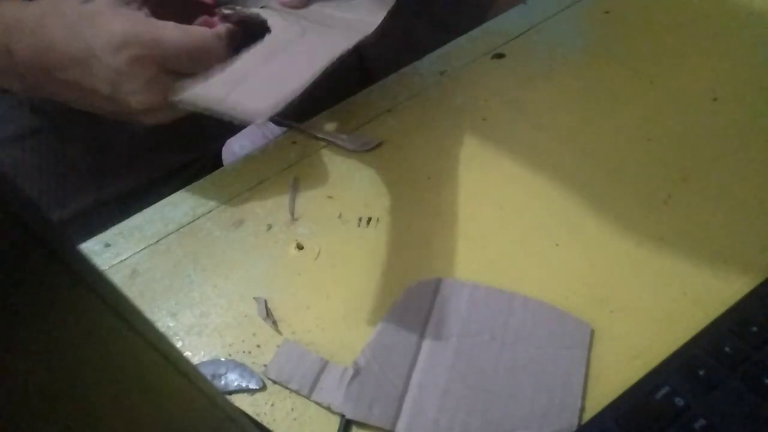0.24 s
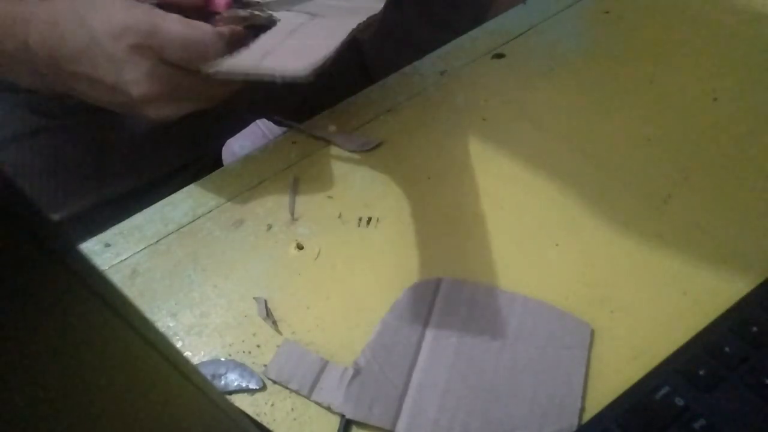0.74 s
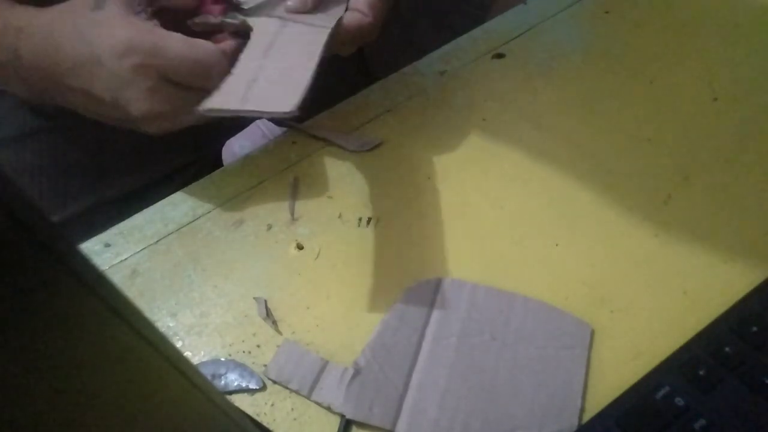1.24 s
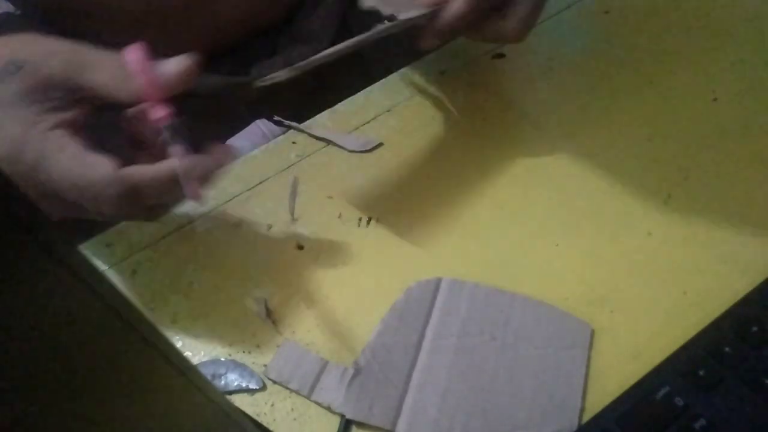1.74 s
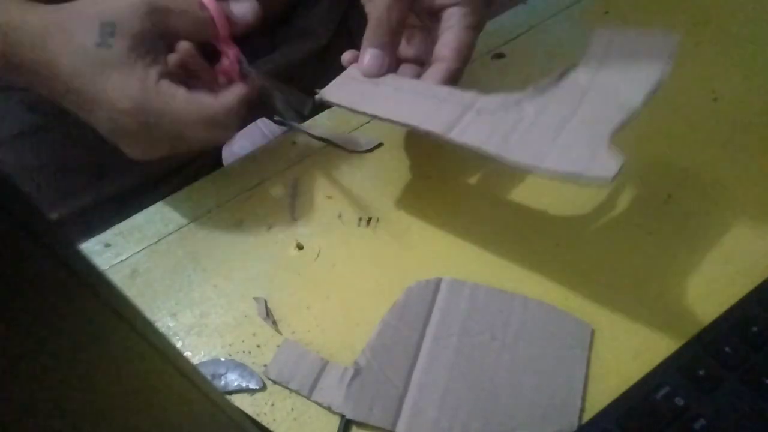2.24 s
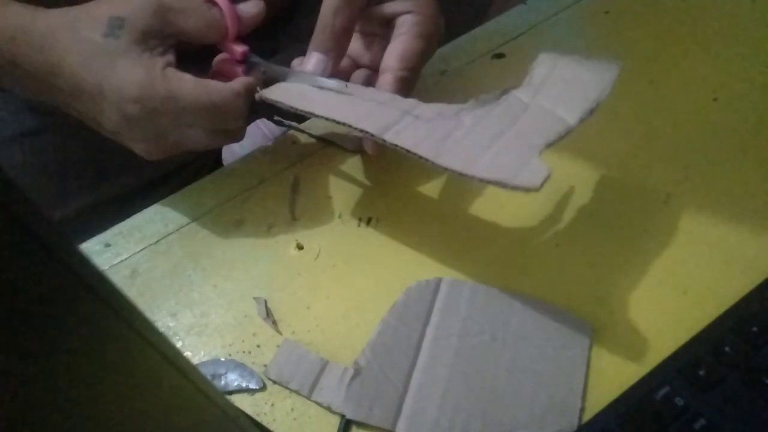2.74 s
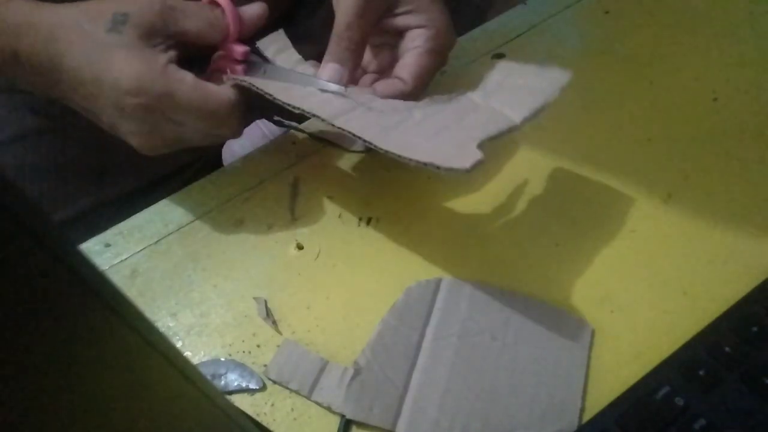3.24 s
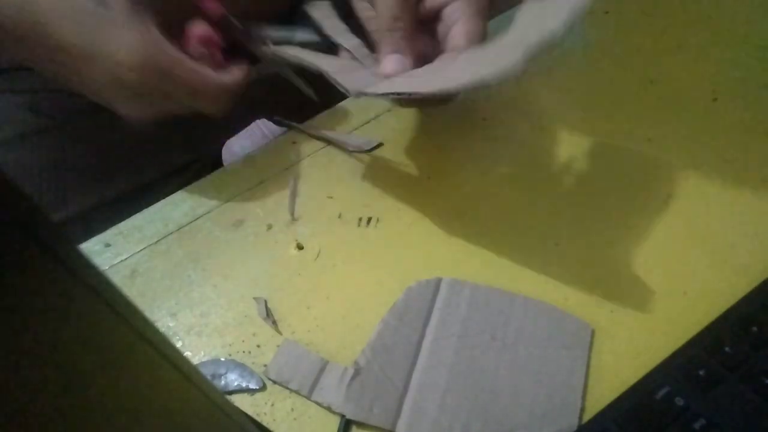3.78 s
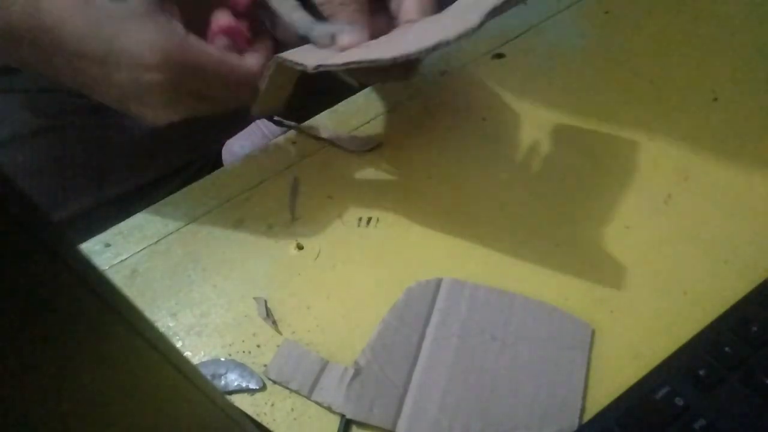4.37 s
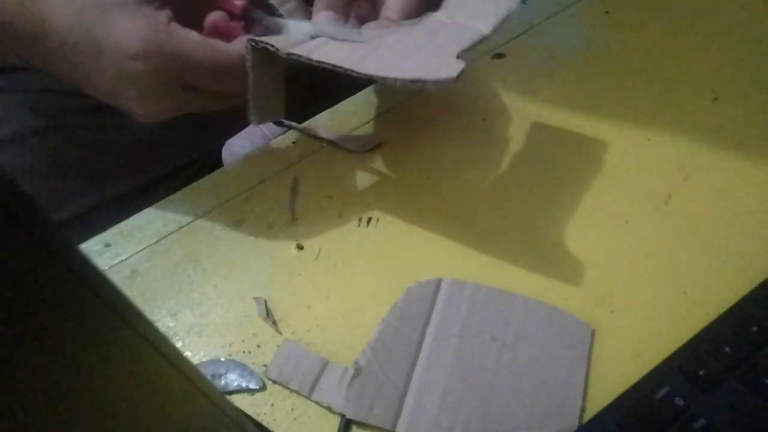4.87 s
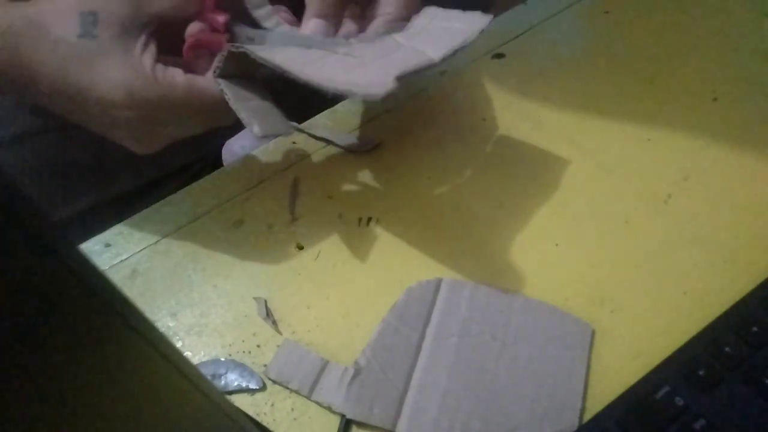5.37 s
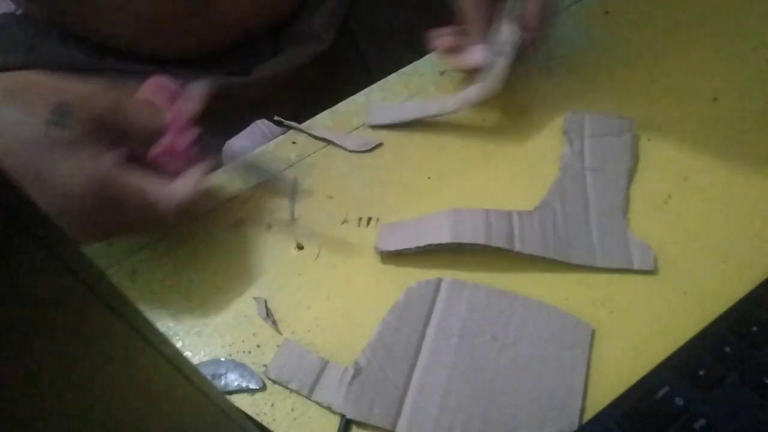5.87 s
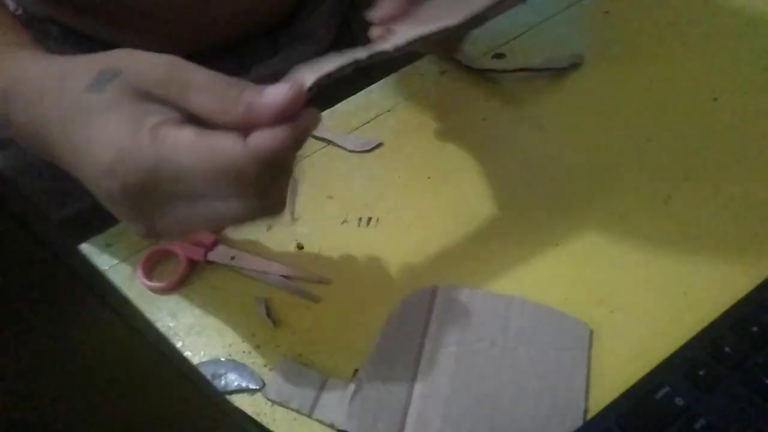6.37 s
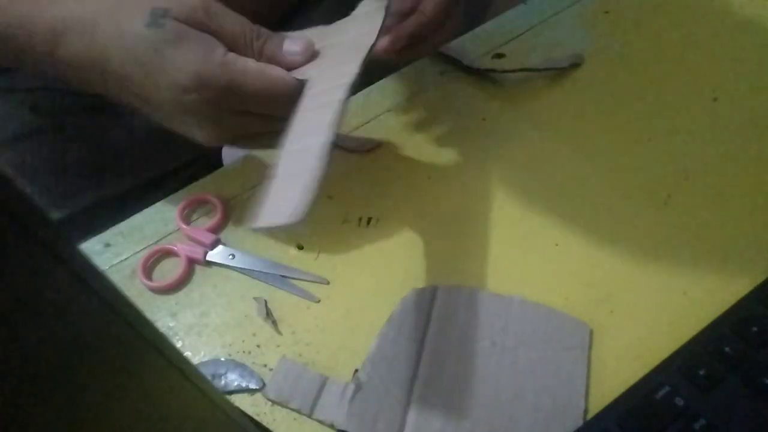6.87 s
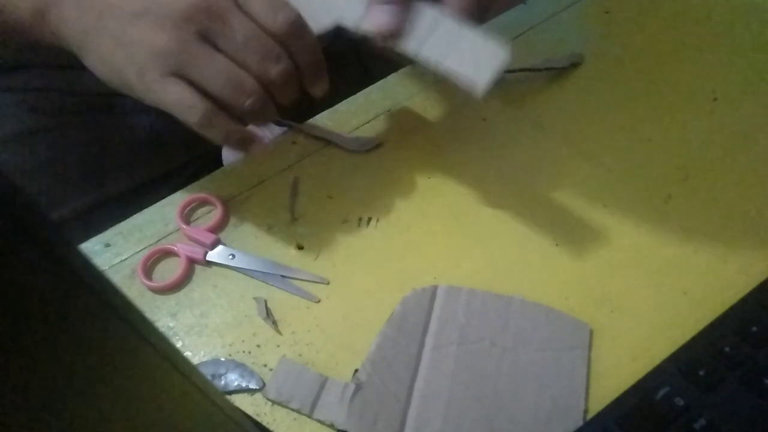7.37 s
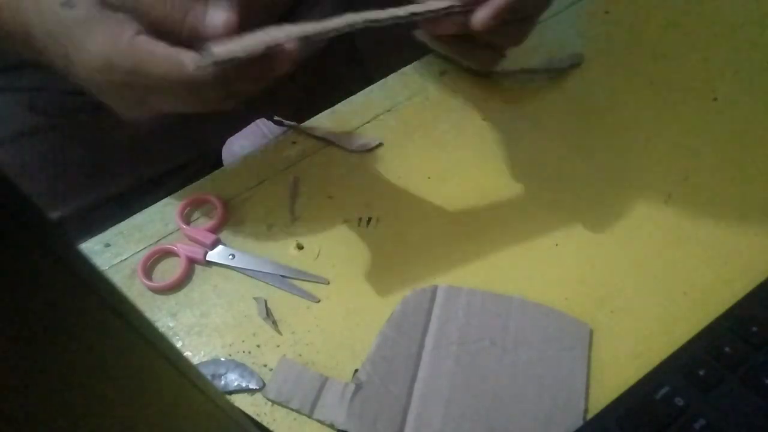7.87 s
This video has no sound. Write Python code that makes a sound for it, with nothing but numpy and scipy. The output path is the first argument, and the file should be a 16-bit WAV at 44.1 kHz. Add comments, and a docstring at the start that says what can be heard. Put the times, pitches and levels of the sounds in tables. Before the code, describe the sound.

A fan's draught buffets a nearby phone microphone with an uneven low rumble and thumps, over a faint rush of air in a room. Close by, scissors and fingers scrape, crunch and click through a piece of cardboard in irregular clusters. Near the end the scissors land on the table with a brief clatter, followed by more light rasping as the card is handled.

```python
"""Low thumps of a fan's draught on the microphone, and cardboard snapping under small scissors.
Blades and fingers rasp over the corrugated card in short strokes; fibres break and the sheet knocks.
The blades squeak faintly once; near 6 s the scissors ring against the table, then the rasping goes on.
The fan's steady rush fills the middle. All is heard in a room, close to a phone."""
import sys
import numpy as np
from scipy import signal
from scipy.fft import rfft, irfft, next_fast_len
from scipy.io import wavfile
from scipy.ndimage import uniform_filter1d

SR = 44100
rng = np.random.default_rng(int(sys.argv[2]) if len(sys.argv) > 2 else 0)


def wav_out(sig):
    """Save sig, one row per channel (or a flat mono array), as 16-bit PCM at SR to the path in sys.argv[1]."""
    wavfile.write(sys.argv[1], SR, np.round(np.clip(np.atleast_2d(sig).T, -1, 1) * 32767).astype(np.int16))


N = 358533
BURST_SAMPLES = int(.12 * SR)

# Blade or finger strokes on the card: t/s, length/s, level/dB, swell/dB, coarse-fibre lift/dB
STROKES = [(0.245, 0.028, -64.5, 7, -1), (0.594, 0.067, -56.5, 6, 1), (0.757, 0.02, -52, -2, 1),
           (0.845, 0.051, -57, -3, -4), (0.912, 0.035, -56.5, -8, -2), (0.945, 0.062, -54, 0, 4),
           (1.186, 0.059, -50, -2, 3.5), (1.351, 0.029, -49, 2, -1), (1.417, 0.041, -51.5, -17, 4),
           (1.483, 0.16, -54, -15.5, -0.5), (1.843, 0.08, -49.5, -2, -5.5), (2.096, 0.11, -61, -13, -7),
           (2.222, 0.043, -51, 5, -13), (2.698, 0.031, -47, 13, -13), (2.8, 0.038, -46.5, -2, -9),
           (2.869, 0.055, -49.5, -19, -13), (2.988, 0.03, -57, -4, -6), (3.075, 0.077, -48.5, -4, -2.5),
           (3.215, 0.054, -51, -2, -0.5), (3.322, 0.036, -46, -11, -1.5), (3.503, 0.052, -51.5, -8, -8),
           (3.572, 0.043, -55, 5, -2), (3.66, 0.033, -54.5, -5, -8), (3.742, 0.038, -48, -8, 5),
           (3.825, 0.07, -63, -2, 0), (3.904, 0.049, -57.5, -17, 6.5), (3.992, 0.072, -54, 7, 0.5),
           (4.099, 0.022, -39.5, -7, 0), (4.281, 0.05, -49.5, 10, -3), (4.346, 0.04, -44, -5, -1),
           (4.39, 0.045, -54, -4, -4), (4.565, 0.042, -61, -5, 3), (4.639, 0.032, -46.5, -5, -6),
           (4.76, 0.05, -37.5, -4, -6), (4.884, 0.073, -58, -12, -2), (4.987, 0.033, -49, -7, -1),
           (5.108, 0.018, -46.5, -3, -3), (5.151, 0.066, -54.5, -15, -10), (5.239, 0.071, -52.5, 20, -0.5),
           (5.386, 0.05, -53.5, -18, -2), (5.502, 0.046, -49, 1, 1), (5.716, 0.022, -51.5, -11, -6),
           (5.77, 0.028, -52, 2, -2), (5.806, 0.027, -52, 9, -4), (6.129, 0.065, -46.5, 3, 1),
           (6.196, 0.053, -50, 1, 3.5), (6.339, 0.024, -44.5, 7, -8), (6.37, 0.089, -49.5, -3, -4),
           (6.455, 0.048, -46.5, 1, -2), (6.522, 0.042, -52, -7, 0), (6.571, 0.089, -50.5, 2, 1),
           (6.697, 0.033, -54.5, -2, -3), (6.778, 0.072, -55, -18, -4), (6.85, 0.033, -56, -10, 2),
           (6.942, 0.025, -60, 23, 3), (7.034, 0.092, -50, 11, -4.5), (7.227, 0.066, -49.5, 4, -2),
           (7.315, 0.053, -66, -4, 2), (7.362, 0.11, -46.5, 3, -5), (7.45, 0.13, -52, 10, -1),
           (7.795, 0.05, -57, 6, -3), (8.008, 0.035, -52, 3, -2)]


def rasp():
    """Dense tearing fibres of uneven size, pressed on and let go in strokes."""
    # Tearing spectrum: f/Hz, density/dB
    spectrum = [(1000, -16.5), (2500, -15.5), (5500, -18.5), (7000, -13.5), (7800, -3.5), (8570, 0),
                (9300, -7.5), (10400, -12), (13500, -14), (15500, -9.5)]
    press_db_per_s, release_db_per_s, arch_db, rustle_db = 1800, 1207, 3.5, -70.5
    t, power = np.arange(N) / SR, np.zeros(N)
    for start_s, length_s, db, swell_db, _ in STROKES:
        age_s = t - start_s
        db += swell_db * (np.clip(age_s / length_s, 0, 1) - .5)
        db -= arch_db * np.minimum((2 * age_s / length_s - 1) ** 2, 1)  # lighter at both ends
        db -= press_db_per_s * np.maximum(0.0043 - age_s, 0)
        db -= release_db_per_s * np.maximum(age_s - length_s + 0.0093, 0)
        power += undb(2 * db)
    ticks = 1 + 28 * uniform_filter1d(1. * (rng.random(N) < 130 / SR), size=14)  # stiffer fibres let go
    fibres = colour(rng.standard_normal(N) * undb(0.93 * walk(700)) * ticks, spectrum)
    grip_tremble = undb(1.6 * walk(60))
    rustle = undb(rustle_db + 5.7 * walk(25))  # card in the hands
    return level(fibres, 0) * (np.sqrt(power) * grip_tremble + rustle)


def snaps():
    """Fibres and flutes break: broad crackle with a faint after-rustle."""
    # Breaks in the card: t/s, level/dB
    breaks = [(0.066, -43), (0.1454, -31.5), (0.1634, -43), (0.176, -39), (0.392, -30.5), (0.5169, -34),
              (0.5428, -23), (0.597, -35), (1.0846, -32), (1.102, -20), (1.3247, -41.5), (1.3373, -41),
              (1.421, -35), (1.595, -34.5), (2.727, -32), (2.875, -26.5), (2.884, -28), (2.901, -29.5),
              (2.927, -28.5), (3.027, -46), (3.052, -42), (3.218, -27.5), (3.242, -39), (3.259, -33),
              (3.316, -39), (3.432, -42), (3.448, -29), (3.4617, -37), (3.477, -36), (3.785, -38),
              (4.101, -30.5), (4.1137, -32), (4.243, -45), (4.357, -31.5), (4.37, -34), (4.6433, -32.5),
              (4.8757, -33), (4.8962, -30.5), (4.913, -35), (5.024, -38.5), (5.063, -47), (5.0917, -37),
              (5.176, -33.5), (5.223, -36.5), (5.297, -42), (5.602, -37), (5.61, -41), (5.625, -29.5),
              (5.631, -35), (5.717, -35.5), (5.765, -34.5), (5.826, -44), (5.889, -42), (6.0644, -25),
              (6.14, -27.5), (6.643, -34), (6.787, -35), (6.98, -47), (7.22, -46)]
    # Crackle spectrum: f/Hz, density/dB
    spectrum = [(400, -29), (900, -8), (2000, -4.5), (5000, -16), (8500, 8.5), (10500, -2), (15500, -6)]
    envelope = np.zeros(N)
    for start_s, db in breaks:
        add(envelope, start_s, undb(db) * (burst(0.0007, 0.013) + 0.16 * burst(0.0023, 0.054)))
    crackle = colour(rng.standard_normal(N), spectrum)
    return level(crackle, 0) * envelope


def stroke_angle(x):
    """Each stroke meets the card at its own angle: more or less coarse fibre, its own flutes singing."""
    flute_hz = (6400, 7300, 9700, 11500)
    starts_s, coarse_db = np.transpose(STROKES)[[0, 4]]
    stroke = np.maximum(np.searchsorted(starts_s, np.arange(N) / SR) - 1, 0)

    def held(per_stroke):
        return uniform_filter1d(per_stroke[stroke], size=100)

    coarse = signal.sosfiltfilt(signal.butter(2, 6800, fs=SR, output="sos"), x)
    fine = signal.sosfiltfilt(signal.butter(2, 10500, "high", fs=SR, output="sos"), x)
    *shares, fine_draw = rng.random((len(starts_s), 5)).T
    flutes = sum(held(share ** 3) * level(ring(x, hz, .003), 0) for share, hz in zip(shares, flute_hz))
    fine_db = held(6 * (fine_draw - .5))
    shelved = x + (undb(held(coarse_db)) - 1) * coarse + (undb(fine_db) - 1) * fine
    return shelved + 0.28 * np.std(x) * flutes


def knocks():
    """A blade's knock rings the sheet at its pitch, with a damped higher mode and a broad crunch."""
    # Knocks on the sheet: t/s, peak/dB, f/Hz
    hits = [(0.543, -30.5, 1290), (1.085, -39.5, 640), (1.105, -33.5, 1246), (1.42, -49, 1600),
            (2.902, -38.5, 740), (2.928, -35.5, 790), (3.449, -33.5, 1180), (3.46, -35.5, 850),
            (3.478, -38.5, 1440), (3.219, -45, 1390), (5.094, -35.5, 1190), (5.627, -34.5, 1240),
            (5.826, -43, 2240)]
    out = np.zeros(N)
    for start_s, db, hz in hits:
        push = np.gradient(burst(0.0017, 0.017) * rng.standard_normal(BURST_SAMPLES))
        sheet = ring(push, hz, 0.054) + 2.2 * ring(push, 1.166 * hz, 0.01)
        sheet += 1.8 * ring(push, 2050, 0.0014)  # crunch
        add(out, start_s, undb(db) * sheet / np.abs(sheet).max())
    return out


def set_down():
    """Scraping contact with the table rings the steel blades and plastic handles."""
    # Table contacts: t/s, peak/dB, contact t60/s, handle share/0-1
    contacts = [(6.047, -35, 0.24, 0.55), (6.064, -21, 0.012, 0.12), (6.138, -23, 0.086, 0.67),
                (6.15, -26, 0.053, 0.9), (6.225, -34.5, 0.08, 0.56)]
    # Blade modes: f/Hz, gain/dB, t60/s
    blade_modes = [(1600, -3, 0.012), (2120, -1.5, 0.014), (3140, -3.5, 0.006), (4370, -2, 0.0049)]
    # Handle modes: f/Hz, gain/dB, t60/s
    handle_modes = [(413, -14, 0.042), (836, 4, 0.016), (1190, 1, 0.0078), (1800, -2, 0.01)]
    out = np.zeros(N)
    for start_s, peak_db, contact_s, share in contacts:
        push = burst(0.00059, contact_s) * rng.standard_normal(BURST_SAMPLES)
        blades = sum(undb(db) * ring(push, hz, t60_s) for hz, db, t60_s in blade_modes)
        handles = sum(undb(db) * ring(push, hz, t60_s) for hz, db, t60_s in handle_modes)
        click = ring(push, 2240, 0.002)
        clack = (1 - share) * level(blades, 0) + share * level(handles, 0) + 0.26 * level(click, 0)
        add(out, start_s, undb(peak_db) * clack / np.abs(clack).max())
    return out


def squeak():
    """Blades slide open: two faint, thin, flickering bands."""
    start_s, end_s, fade_s, band_db = 2.2, 2.5, .03, -69
    t, bands = np.arange(N) / SR, np.zeros(N)
    for hz in (14000, 14900):
        band = ring(ring(rng.standard_normal(N), hz, .004), hz, .004)
        bands += level(band * undb(4 * walk(25)), band_db)
    return bands * np.clip(np.minimum(t - start_s, end_s - t) / fade_s, 0, 1)


def draught():
    """Turbulence on the microphone: uneven pressure kicks, louder and brighter in a gust."""
    # Gust strength: t/s, level/dB
    gusts = [(0.1, -32), (0.44, -40), (0.6, -33), (1.2, -42.5), (1.42, -34), (1.94, -46.5), (2.12, -36.5),
             (2.4, -41), (2.55, -33.5), (2.8, -37), (4.26, -37), (4.5, -32), (5.2, -36.5), (6.1, -32),
             (6.6, -37.5), (6.68, -46.5), (7.48, -38.5), (7.69, -34), (8.13, -37)]
    # Pressure-kick spectrum: f/Hz, density/dB
    spectrum = [(15, -17), (30, 2.5), (70, 1.5), (120, -3.5), (190, -13), (280, -29), (450, -64),
                (1000, -76)]
    kicks_per_s, neutral_db, bright_db_per_db = 220, -29, 0.15
    gust_db = np.interp(np.arange(N) / SR, *np.transpose(gusts))
    onsets = rng.random(N) < kicks_per_s / SR
    lumps = walk(12)  # the flow arrives in lumps, a few a second
    lumps = level(lumps - uniform_filter1d(lumps, size=SR // 2), 0)
    kicks = level(colour(rng.standard_normal(N) * onsets * undb(3.24 * lumps), spectrum), 0)
    swirl = signal.sosfilt(signal.butter(2, [22, 65], "band", fs=SR, output="sos"), rng.standard_normal(N))
    buffet = level(kicks + level(swirl * undb(2.7 * lumps), -2.8), 0)
    upper_bass = signal.sosfiltfilt(signal.butter(2, 110, "high", fs=SR, output="sos"), buffet)
    brightness = undb(bright_db_per_db * (gust_db - neutral_db))
    return undb(gust_db) * (buffet + (brightness - 1) * upper_bass)


def eddies():
    """Eddies burst on the microphone: pressure wobbles, each with its own swing and trail."""
    # Eddy arrivals: t/s, envelope peak/dB
    arrivals = [(0.115, -19), (0.244, -22), (0.557, -25.5), (1.38, -32.5), (1.611, -26.5), (3.936, -27),
                (4.504, -26), (4.556, -24), (4.812, -25.5), (4.905, -26.5), (5.393, -21), (6.014, -24),
                (6.221, -28.5), (7.664, -25), (7.725, -27)]
    scale_s = 0.001545
    t, out = np.arange(-900, 900) / SR, np.zeros(N)
    u = t / scale_s
    for centre_s, db in arrivals:
        phase_turns, lean = rng.random(2)
        steepness = np.where(u > 0, 0.25 + .5 * lean, .9)
        envelope = np.exp(-(np.sqrt(u ** 2 + 1) - 1) * steepness) * np.hanning(len(t))
        add(out, centre_s + t[0], undb(db) * envelope * np.cos(1.267 * u + 2 * np.pi * phase_turns))
    return out


def fan():
    """Steady air rush, housing hums and the motor's wandering whine."""
    # Air-rush spectrum: f/Hz, density/dB
    spectrum = [(200, -34), (450, -15), (800, -8.5), (1600, -6.5), (3000, -17), (5000, -30), (8600, -31),
                (11000, -36), (15500, -29)]
    # Housing resonances: f/Hz, width/Hz, level/dB
    housing = [(600, 400, -64), (804, 185, -68), (1102, 33, -69)]
    whine_hz, wander_hz = 1812, 14
    rush = level(colour(rng.standard_normal(N), spectrum), db=-61) * undb(1.46 * walk(4.81))
    hums = sum(level(ring(rng.standard_normal(N), hz, 3.16 / width), db) for hz, width, db in housing)
    phase = 2 * np.pi * np.cumsum(whine_hz + wander_hz * walk(15)) / SR
    whine = np.sin(phase) * undb(2.1 * walk(20))
    return rush + hums + level(whine, db=-70.5)


def room(x, t60_s, wet_db):
    """Direct sound plus a short diffuse tail."""
    t = np.arange(SR // 4) / SR
    tail = rng.standard_normal(len(t)) * np.exp(-np.log(1000) * t / t60_s)
    return x + undb(wet_db) * signal.fftconvolve(x, tail / np.linalg.norm(tail))[:N]


def undb(db):
    return 10 ** (np.asarray(db) / 20)


def level(x, db):
    """Scale to an RMS level."""
    return x * undb(db) / np.sqrt(np.mean(x ** 2))


def colour(x, points):
    """Filter by a curve of f/Hz, gain/dB."""
    hz, db = np.transpose(points)
    size = next_fast_len(N)
    bin_hz = np.arange(size // 2 + 1) * SR / size + 1
    gain = undb(np.interp(np.log(bin_hz), np.log(hz), db))
    return irfft(rfft(x, size) * gain, size)[:N]


def ring(x, hz, t60_s):
    """One resonance; a unit impulse rings with peak near 1."""
    w, r = 2 * np.pi * hz / SR, np.exp(-np.log(1000) / (t60_s * SR))
    return signal.lfilter([0, np.sin(w)], [1, -2 * r * np.cos(w), r * r], x)


def walk(rate_hz):
    """Random steps, smoothed twice; RMS 1."""
    hold = int(SR / rate_hz)
    steps = np.repeat(rng.standard_normal(N // hold + 1), hold)
    return level(uniform_filter1d(uniform_filter1d(steps, hold), hold)[:N], 0)


def add(out, start_s, sound):
    i = int(start_s * SR)
    out[i:i + len(sound)] += sound[:N - i]


def burst(rise_s, t60_s):
    """Crack envelope: quick rise, exponential fall."""
    t = np.arange(BURST_SAMPLES) / SR
    return (1 - np.exp(-t / rise_s)) * np.exp(-np.log(1000) * t / t60_s)


def scene():
    """Hands at work, their room tail, the fan and its draught; mono."""
    hands = stroke_angle(rasp() + snaps()) + knocks() + set_down() + squeak()
    return (room(hands, t60_s=.2, wet_db=-24) + fan() + draught() + eddies())[None]


def record(dry):
    """The phone cuts the top."""
    top_hz = 15500
    return signal.sosfilt(signal.ellip(11, .5, 50, top_hz, fs=SR, output="sos"), dry)


dry = scene()
out = record(dry)
wav_out(out)
```